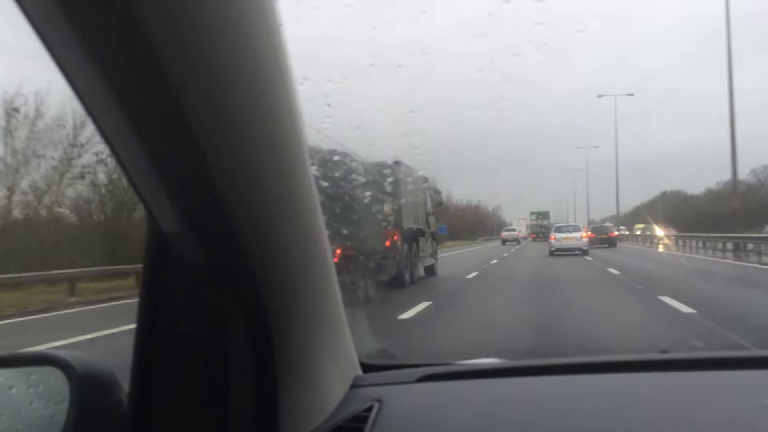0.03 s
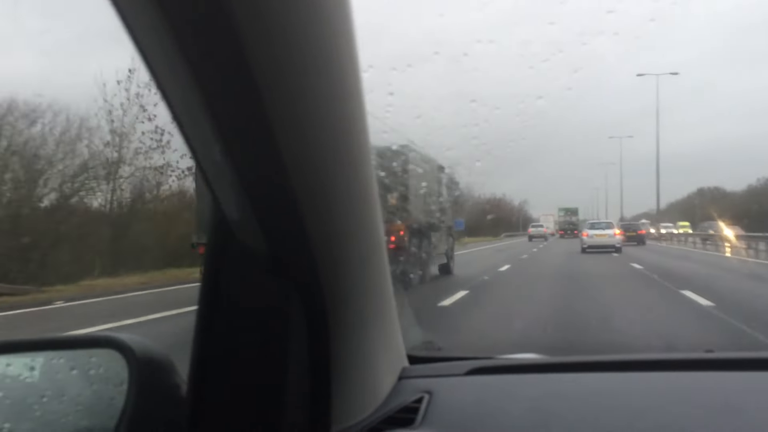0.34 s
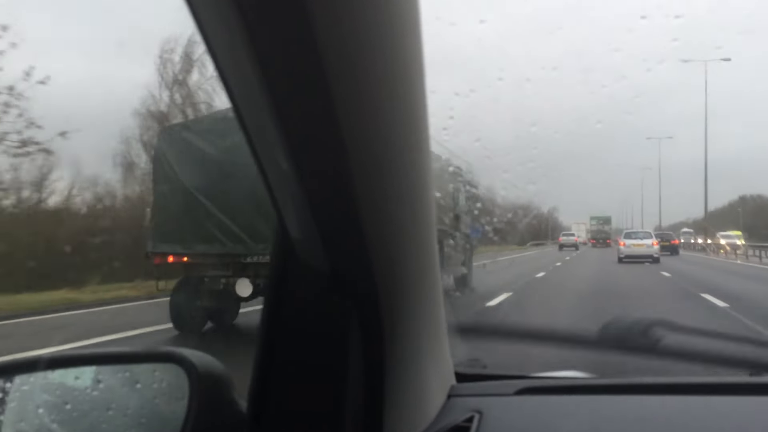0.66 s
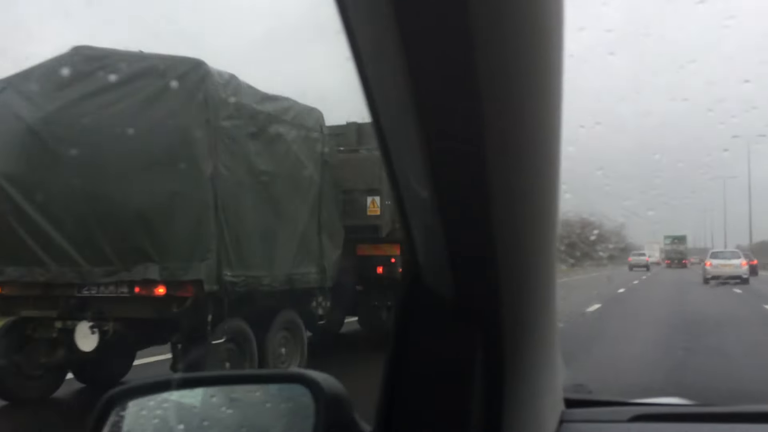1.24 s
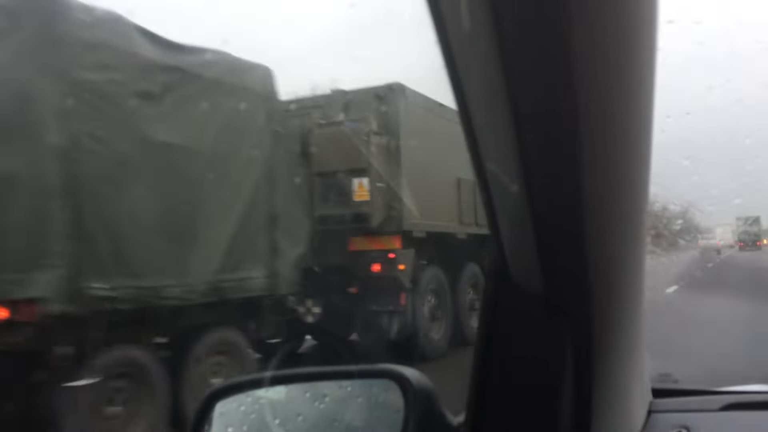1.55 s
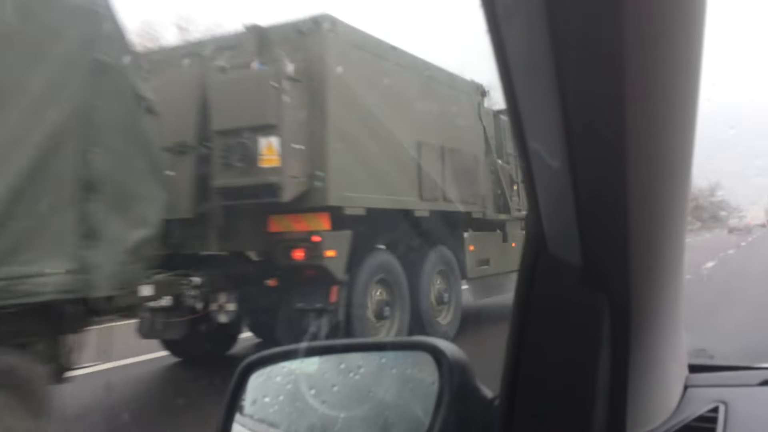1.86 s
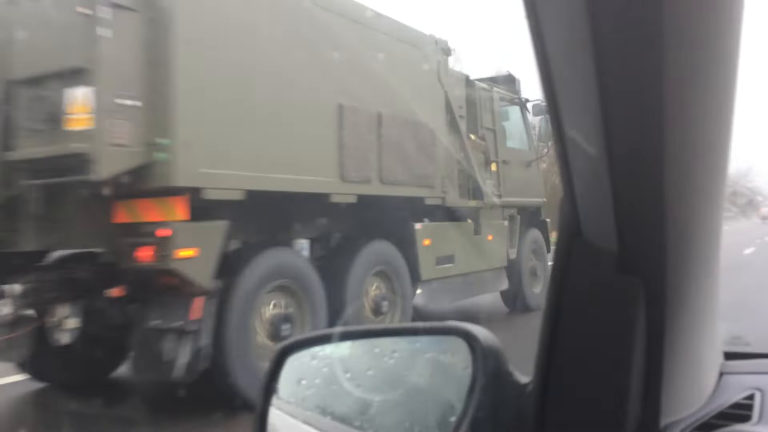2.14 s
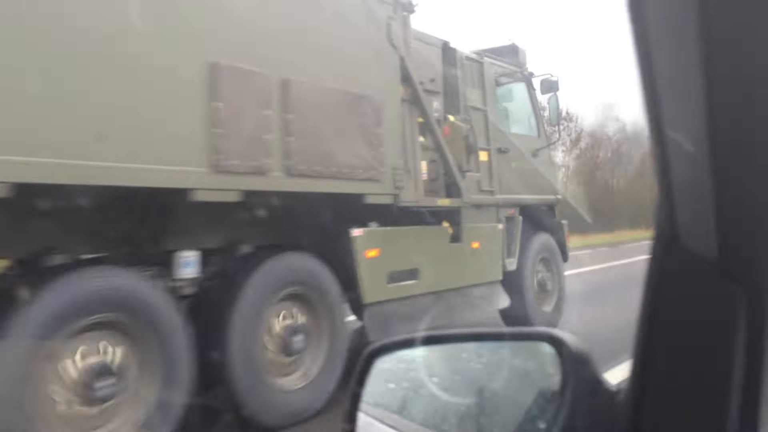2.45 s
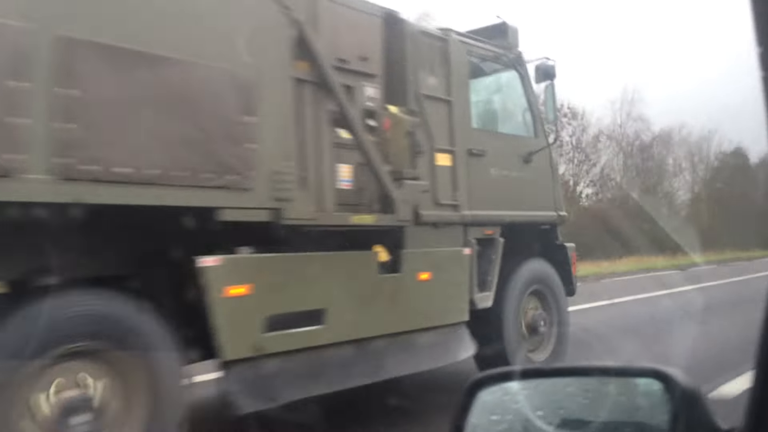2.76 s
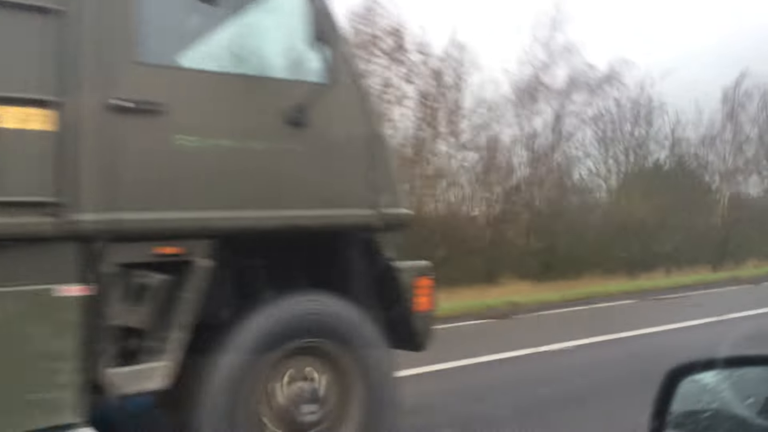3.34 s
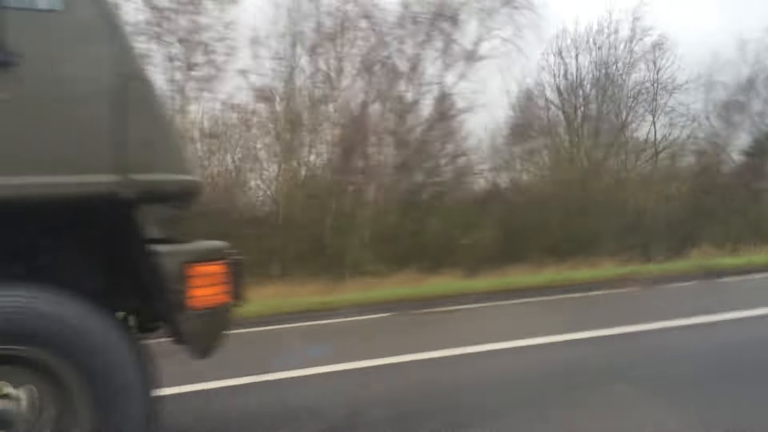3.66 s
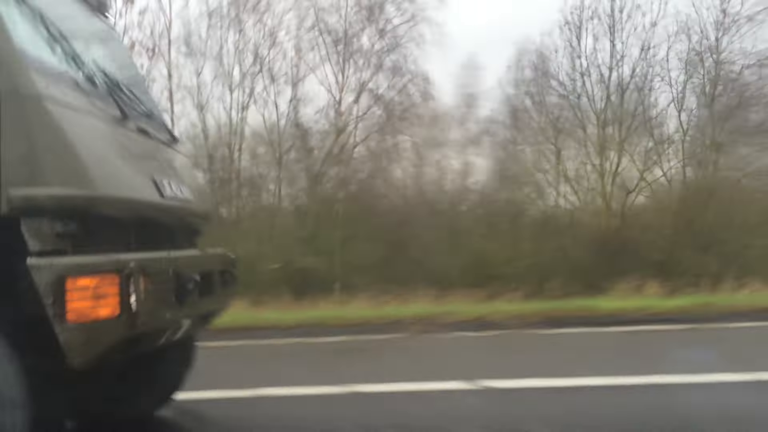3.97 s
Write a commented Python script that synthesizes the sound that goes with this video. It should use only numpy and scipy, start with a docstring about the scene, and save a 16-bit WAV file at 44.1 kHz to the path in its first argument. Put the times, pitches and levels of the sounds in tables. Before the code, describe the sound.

Steady road rumble and rushing wind fill a car on a wet motorway. A lorry's tyre roar rises in pitch, then its engine drones alongside, while spray hisses and drops tick on the windows.

```python
"""Passing an army lorry in the rain

Inside a car on a wet motorway, road rumble, tyre boom and rushing wind fill the cabin. The roar and
whine of the lorry's and trailer's tyres climb in pitch as they near, then a surging drone and whirr
come alongside. Spray hisses on the side window, drops tick on the glass, splashes knock on the body."""
import sys
import numpy as np
from scipy import signal
from scipy.fft import rfft, irfft
from scipy.io import wavfile
from scipy.ndimage import uniform_filter1d

SR = 44100
rng = np.random.default_rng(int(sys.argv[2]) if len(sys.argv) > 2 else 0)


def unload_audio(sound):
    """Save the sound as a 16-bit wav file, at the path given as the first command line argument."""
    columns = np.transpose(np.atleast_2d(sound))
    # keep every value between -1 and 1, then stretch to whole-number steps
    steps = np.round(np.clip(columns, -1, 1) * 32767)
    wavfile.write(sys.argv[1], SR, steps.astype(np.int16))


N = 176400
T = np.arange(N) / SR
HZ = np.fft.rfftfreq(N, 1 / SR)

# Roar of the lorry's tyres: time_s, pitch_hz, level_db
ROAR = [(0, 977, -40), (.35, 939, -41), (.58, 988, -38), (.85, 1138, -42), (1.2, 1200, -42),
        (1.5, 1363, -43), (1.8, 1387, -45), (2.35, 1435, -46.5), (3.2, 1420, -45), (4, 1439, -52)]
# Tone of the broad noise around the roar: frequency_hz, gain_db
ROAR_SKIRT = [(400, -34), (800, 8), (1100, -7), (1400, -12), (1650, 4.5), (2150, -3), (2340, -0.5),
              (2600, -7.5), (5000, -31)]
# Pitches that the side window boosts: pitch_hz, width_hz, boost_db
WINDOW_RINGS = [(870, 140, 6.5), (1110, 52, 7), (1253, 31, 8.5), (1435, 50, 7)]
# Whine of the trailer's tread: time_s, pitch_hz, level_db
WHINE = [(0, 994, -54), (.8, 1075, -52), (.9, 1161, -43), (1.15, 1176, -44), (1.53, 1127, -45),
         (1.68, 1141, -61)]
# Tone of the lorry's drone: frequency_hz, gain_db
DRONE_TONE = [(100, -19), (230, 9), (350, -0.5), (470, 2), (600, -4), (740, -6), (950, -59), (2000, -57)]
# Loudness of the drone: time_s, level_db
DRONE_LEVEL = [(0, -65), (.9, -41.5), (1.25, -40), (1.4, -37), (1.6, -36.5), (1.75, -41), (2, -34),
               (2.12, -34.5), (2.48, -33), (2.63, -42.5), (2.8, -31), (3.1, -37), (3.24, -33.5),
               (3.37, -35), (3.51, -37), (3.72, -32), (4, -33)]
# Engine notes within the drone: pitch_hz, width_hz, gain_db
ENGINE_NOTES = [(234, 4.3, -5), (268.1, 8.35, -6), (353.8, 25, -5), (547, 8, -14), (716, 60, -18)]
# Surges of the lorry's whirring drive: time_s, level_db
WHIRR_LEVEL = [(0, -52), (.45, -60), (.72, -51), (1.15, -49), (1.68, -56), (2.08, -54), (2.3, -48),
               (2.48, -46), (2.62, -54), (3.3, -47), (3.5, -52.5), (3.68, -46.5), (4, -52.5)]
# Notes around the whirr's main pitch: offset_hz, gain_db
WHIRR_NOTES = [(-130, -3.5), (0, 0), (100.5, -5.5)]

# Tone of the spray on the window: frequency_hz, gain_db
SPRAY_TONE = [(800, -10), (2000, 3.5), (3200, 6), (5000, 3), (7000, .8), (10000, 0), (15500, -3.2)]
# Loudness of the spray: time_s, level_db
SPRAY_LEVEL = [(0, -62), (.43, -61), (.52, -51), (.6, -54.5), (.72, -56), (.95, -52.5), (1.23, -48.5),
               (1.38, -51), (1.5, -58), (2.05, -59), (2.5, -63), (3.08, -68), (3.25, -55), (3.58, -59),
               (3.7, -72), (4, -63)]
# Heavy splashes on the body: start_s, level_db, snap_hz, panel_gain_db
SPLASHES = [(.749, -35, 2900, -1), (1.742, -37.5, 3000, -12), (1.9195, -29.5, 2900, -12),
            (1.9222, -28.5, 2000, 0), (1.9315, -38.5, 5500, -3), (2.777, -37, 3300, -1),
            (2.7885, -34, 6400, 4)]
# Tone of a splash: frequency_hz, gain_db
SPLASH_TONE = [(200, -2), (700, 6), (1400, 6), (2000, 7), (3000, 6), (4500, -4), (9000, -12), (15000, -25)]
# Notes of a struck panel, each dying away by 60 dB: pitch_hz, gain_db, fade_s
PANEL_NOTES = [(560, -4, .07), (750, -4, .065), (900, -5, .06), (1080, -5, .07), (1370, -4, .08),
               (1940, -10, .07)]
# Single drops on the glass: start_s, level_db
DROPS = [(.1098, -41.5), (.4812, -45), (.5237, -44), (.5322, -41.5), (.6205, -44), (.657, -42),
         (1.525, -46), (2.129, -46), (2.4325, -45)]
# Tone of a drop: frequency_hz, gain_db
DROP_TONE = [(700, -17), (2500, 10), (6000, 8.5), (12000, 1), (15500, -15)]

# Tone of the road rumble: frequency_hz, gain_db
RUMBLE_TONE = [(15, -44), (33, -37), (45, -25), (54, -0.5), (70, -8.5), (95, 0.5), (125, 2), (165, -3),
               (205, -10.5), (300, -17), (450, -18.5), (620, -40), (1200, -65)]
# Loudness of the rumble: time_s, level_db
RUMBLE_LEVEL = [(0, -21), (.25, -21), (.65, -20.5), (.8, -20.5), (1.15, -23), (1.5, -19.5), (1.9, -22.5),
                (2.35, -21.5), (2.63, -20.5), (2.95, -20.5), (3.27, -19.5), (3.65, -20.5), (4, -23)]
# Tone of the car body's low throb: frequency_hz, gain_db
THROB_TONE = [(15, -40), (30, -3), (42, -2.5), (54, 7), (66, -1), (100, -1), (200, -55)]
# Loudness of the throb: time_s, level_db
THROB_LEVEL = [(0, -32), (.55, -33.5), (1, -31.5), (1.25, -41), (1.7, -31.5), (2.3, -28.5), (2.85, -31.5),
               (3.15, -36), (3.6, -30.5), (4, -34)]
# Pitches at which the cabin and panels ring: pitch_hz, width_hz, level_db
CABIN_RINGS = [(96, 9.8, -40.5), (237.7, 8, -42.5), (269.9, 6.8, -43), (353.6, 13.6, -44)]
# Boom of the air inside the tyres: time_s, level_db
BOOM_LEVEL = [(0, -60), (.25, -22.5), (.45, -35), (.9, -38.5), (1.1, -27), (1.6, -24), (2.05, -30),
              (2.4, -26.5), (2.65, -26), (3.2, -21), (3.65, -28.5), (3.8, -25.5), (4, -30)]
# Bumps in the road: time_s, level_db, pitch_hz
BUMPS = [(.033, -13.5, 72), (.213, -13, 62), (.347, -16, 60), (.451, -17, 70), (.548, -16, 65),
         (1.005, -14.5, 105), (1.69, -14.5, 100), (2.688, -13.5, 100), (2.85, -17, 50), (3.242, -13, 125),
         (3.45, -13, 120)]
# Tone of the wind and tyre rush: frequency_hz, gain_db
RUSH_TONE = [(100, -1.5), (400, 3.5), (650, 0), (1000, 4.5), (1500, -3), (2030, -6), (2300, -11),
             (3200, -13), (4500, -19), (7000, -25), (10000, -30.5), (12500, -47), (15500, -58)]
# Loudness of the rush: time_s, level_db
RUSH_LEVEL = [(0, -37.5), (1.2, -36), (3, -38), (4, -38)]


def tyre_roar(far_width_hz=640, near_width_hz=290, near_at_s=2.3, skirt_db=-5.5):
    """The lorry's tyres, heard through the window: the roar rises and narrows as they near."""
    hz, near = curve(ROAR), np.clip(T / near_at_s, 0, 1)
    roar = np.sqrt(1 - near) * ring(hz, far_width_hz) + np.sqrt(near) * ring(hz, near_width_hz)
    window_db = sum(db / (1 + (2 * (HZ - f) / width) ** 2) for f, width, db in WINDOW_RINGS)
    return amp(curve(ROAR, column=2)) * (boost(roar, window_db) + amp(skirt_db) * noise(ROAR_SKIRT))


def tread_whine():
    """The trailer's tread sings on the road."""
    return amp(curve(WHINE, column=2)) * ring(curve(WHINE), width_hz=85, steady=0.5)


def lorry_drone():
    """Low noise and engine notes swell as the lorry comes alongside."""
    drone = noise(DRONE_TONE)
    engine = sum(amp(db) * ring(hz, width, steady=0.38) for hz, width, db in ENGINE_NOTES)
    return amp(curve(DRONE_LEVEL)) * (drone + engine)


def drive_whirr(pitch_hz=1985, sink_hz_per_s=20):
    """The lorry's drive whirrs in surges while its pitch slowly sinks."""
    hz = pitch_hz - sink_hz_per_s * T
    whirr = sum(amp(db) * ring(hz + offset, width_hz=40) for offset, db in WHIRR_NOTES)
    return amp(curve(WHIRR_LEVEL)) * unit(whirr)


def spray(mist_share=0.62, gust_db=1.0):
    """The lorry's wheels throw smooth mist and crackling droplets at the window."""
    mist = np.sqrt(mist_share) * rng.standard_normal(N)
    droplets = np.sqrt(1 - mist_share) * impacts(per_s=900, spread_db=2)
    level_db = curve(SPRAY_LEVEL) + gust_db * wobble(rate_hz=37)
    return amp(level_db) * colour(mist + droplets, SPRAY_TONE)


def splashes(decay_s=.003, snap_db=10, snap_width_octaves=.3):
    """Heavy splashes slap the body, each with its own snap, and briefly ring a panel."""
    out, t = np.zeros(N), T[:SR // 5]
    panel = sum(amp(db - 60 * t / fade_s) * np.sin(2 * np.pi * hz * t) for hz, db, fade_s in PANEL_NOTES)
    for start_s, db, snap_hz, panel_db in SPLASHES:
        octaves = np.log2((HZ + 1) / snap_hz)
        snap = boost(noise(SPLASH_TONE), snap_db * np.exp(-(octaves / snap_width_octaves) ** 2))
        slap = np.exp(-t / decay_s) * snap[:len(t)]
        add(out, start_s, amp(db) * (slap + amp(panel_db) * panel))
    return out


def rain(patter_db=-64.5, patter_decay_s=.0008, drop_decay_s=.0022):
    """Fine rain and a few larger drops hit the glass, each a tiny burst of noise."""
    hits = abs(impacts(per_s=90, spread_db=2.8))
    bursts = signal.lfilter([1], [1, -np.exp(-1 / (patter_decay_s * SR))], hits)  # each hit fades
    out = amp(patter_db) * unit(bursts * noise(DROP_TONE))
    t = T[:SR // 10]
    for start_s, db in DROPS:
        add(out, start_s, amp(db) * np.exp(-t / drop_decay_s) * noise(DROP_TONE)[:len(t)])
    return out


def road():
    """The road rumbles, the cabin rings, the air in the tyres booms and the body throbs."""
    rumble = amp(curve(RUMBLE_LEVEL)) * noise(RUMBLE_TONE)
    cabin = sum(amp(db) * ring(hz, width, steady=0.62) for hz, width, db in CABIN_RINGS)
    boom = amp(curve(BOOM_LEVEL)) * ring(hz=180.4, width_hz=18, steady=0.97)
    throb = amp(curve(THROB_LEVEL)) * noise(THROB_TONE)
    return rumble + cabin + boom + throb


def bumps(width_s=.011):
    """Bumps come through the suspension as short, soft thuds."""
    out = np.zeros(N)
    for time_s, db, hz in BUMPS:
        t = T - time_s
        out += amp(db) * np.exp(-(t / width_s) ** 2) * np.cos(2 * np.pi * (hz * t + rng.random()))
    return out


def rush(flutter_db=.6, ripple_db=1.3):
    """Wind and tyre noise flutters through the doors; the cabin favours some pitches over others."""
    ripple = unit(uniform_filter1d(rng.standard_normal(len(HZ)), size=140))
    air = boost(noise(RUSH_TONE), ripple_db * ripple)
    return amp(curve(RUSH_LEVEL) + flutter_db * wobble(rate_hz=20)) * air


def amp(db):
    """Turns decibels into a multiplier."""
    return 10 ** (np.asarray(db) / 20)


def unit(x):
    """Scales x to an average strength (rms) of 1."""
    return x / np.sqrt(np.mean(x ** 2) + 1e-20)


def curve(rows, column=1):
    """Joins a time table's points with straight lines."""
    rows = np.array(rows)
    return np.interp(T, rows[:, 0], rows[:, column])


def boost(x, db):
    """Turns each frequency up or down, then scales to strength 1."""
    return unit(irfft(rfft(x) * amp(db), N))


def colour(x, tone):
    """Shapes x with a tone table."""
    hz, db = np.transpose(tone)
    return boost(x, np.interp(np.log2(HZ + 1), np.log2(hz), db))


def noise(tone):
    """Noise with the given tone."""
    return colour(rng.standard_normal(N), tone)


def wobble(rate_hz):
    """Smooth random motion of strength 1."""
    return unit(irfft(rfft(rng.standard_normal(N)) * np.exp(-(HZ / rate_hz) ** 2), N))


def ring(hz, width_hz, steady=0):
    """Something shaken at random rings: wider is noisier, and steady evens out its loudness."""
    shape = 1 / (1 + (2 * np.fft.fftfreq(N, 1 / SR) / width_hz) ** 2)
    shake = np.fft.ifft(shape * (rng.standard_normal(N) + 1j * rng.standard_normal(N)))
    shake /= np.sqrt(1 + steady * unit(abs(shake)) ** 2)
    note = np.exp(2j * np.pi * np.cumsum(hz * np.ones(N)) / SR)
    return unit((shake * note).real)


def impacts(per_s, spread_db):
    """Random clicks, a few larger than the rest."""
    size = amp(spread_db * np.minimum(rng.exponential(1, N), 4))
    return unit(size * rng.choice([-1, 1], N) * (rng.random(N) < per_s / SR))


def add(mix, start_s, sound):
    """Mixes a sound in at start_s."""
    part = mix[max(round(start_s * SR), 0):][:len(sound)]
    part += sound[:len(part)]


def scene():
    """Everything as heard from the passenger seat, in one channel."""
    car = road() + bumps() + rush()
    lorry = tyre_roar() + tread_whine() + lorry_drone() + drive_whirr()
    water = spray() + rain() + splashes()
    return (car + lorry + water)[None]


def record(dry):
    """Cuts away the very highest treble."""
    low_pass = signal.firwin(801, cutoff=15300, window=("kaiser", 9), fs=SR)
    return signal.oaconvolve(dry, low_pass[None], "same")


dry = scene()
out = record(dry)
unload_audio(out)
```